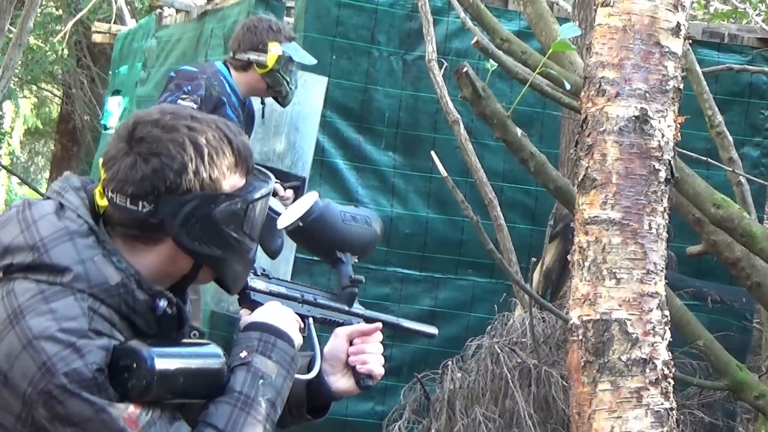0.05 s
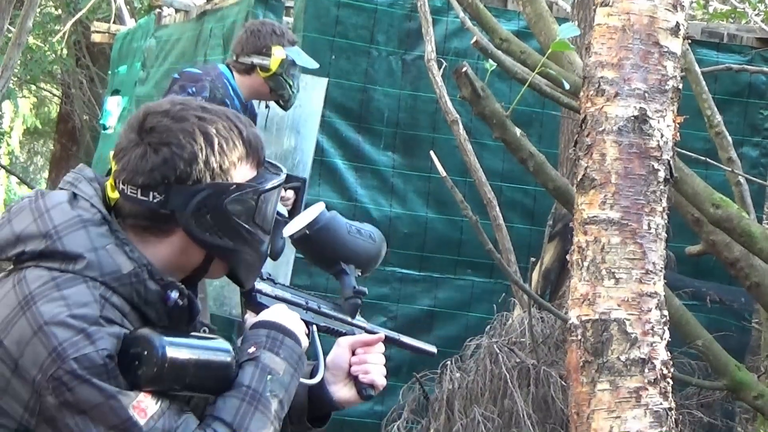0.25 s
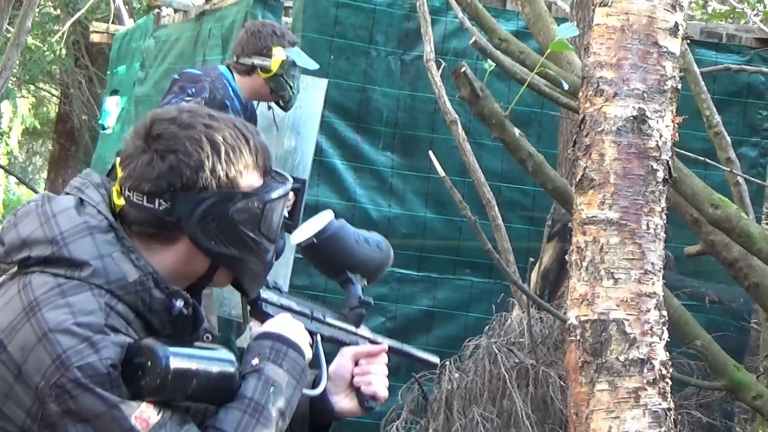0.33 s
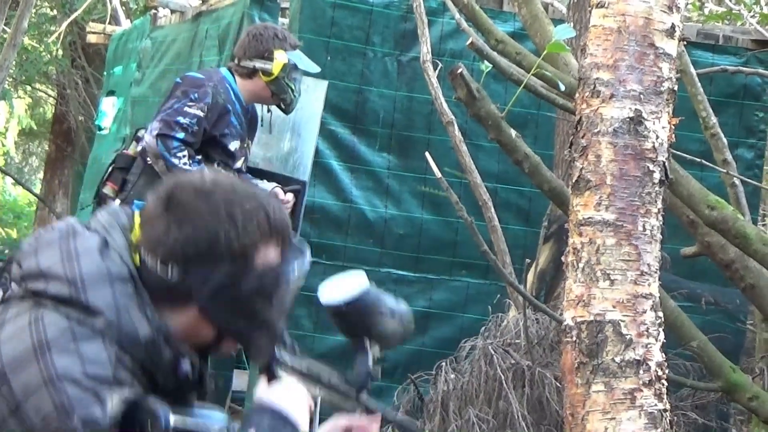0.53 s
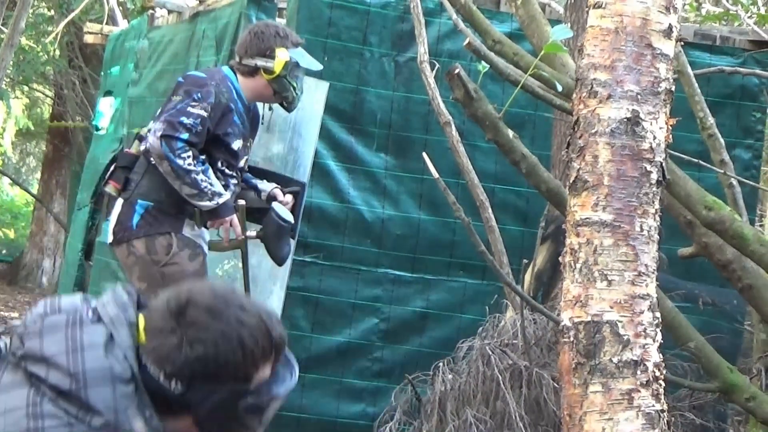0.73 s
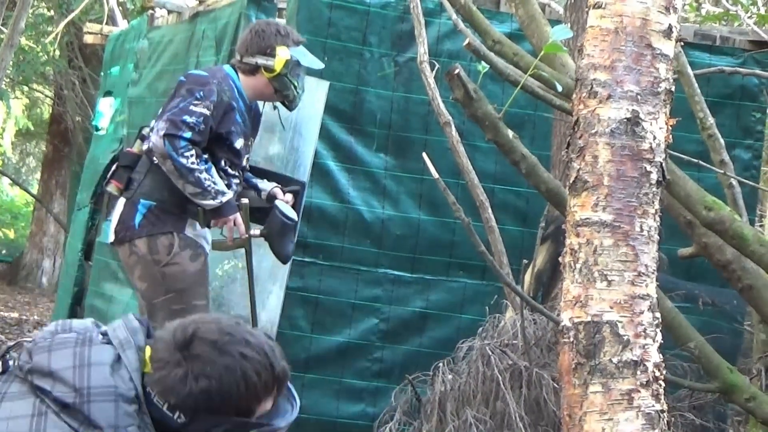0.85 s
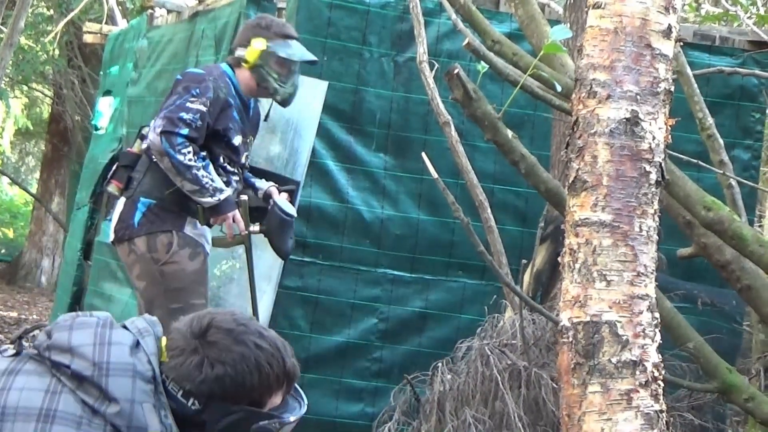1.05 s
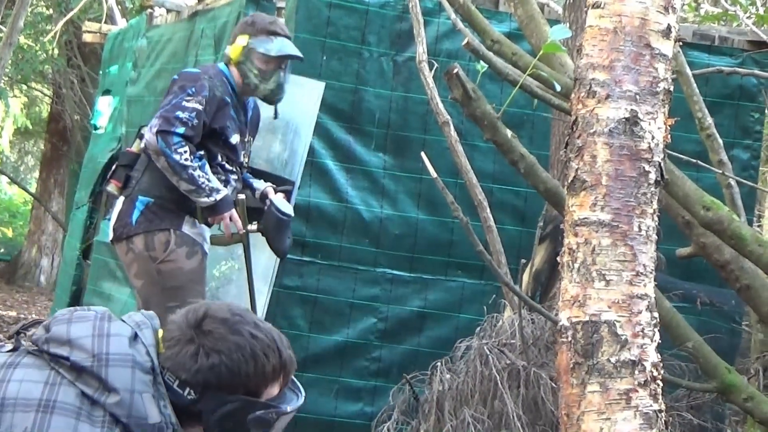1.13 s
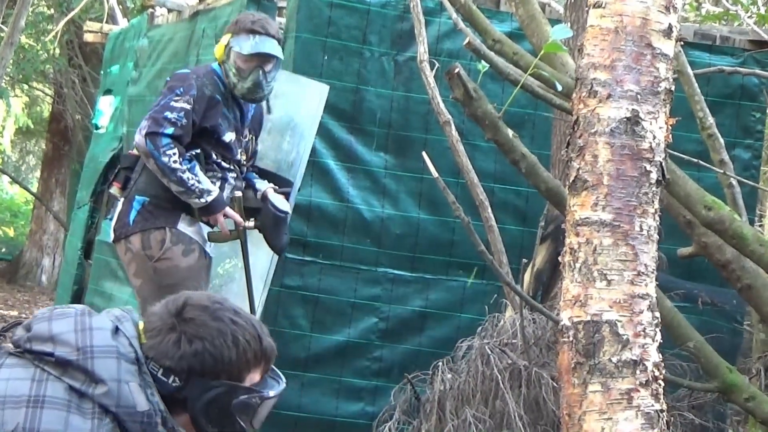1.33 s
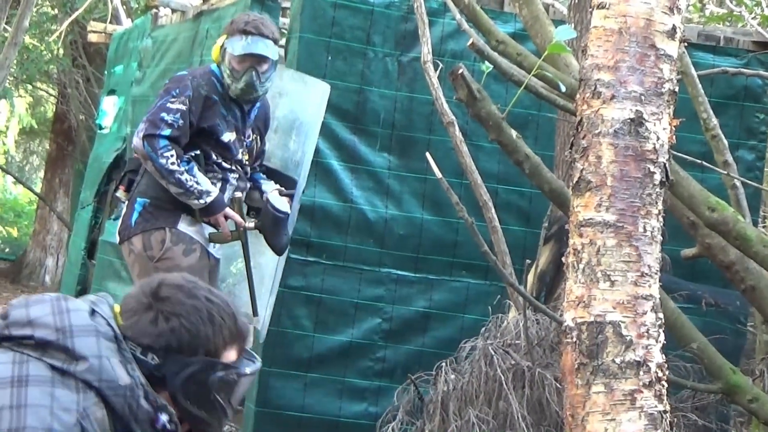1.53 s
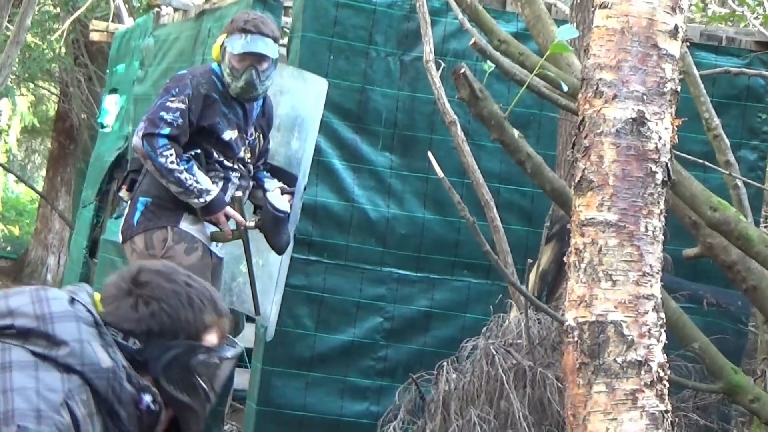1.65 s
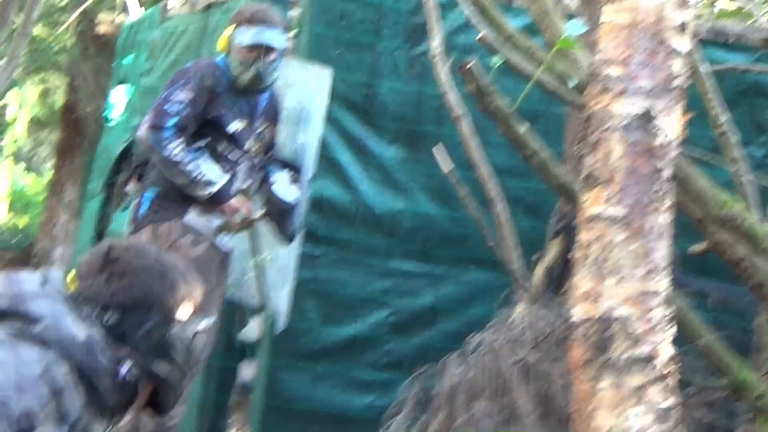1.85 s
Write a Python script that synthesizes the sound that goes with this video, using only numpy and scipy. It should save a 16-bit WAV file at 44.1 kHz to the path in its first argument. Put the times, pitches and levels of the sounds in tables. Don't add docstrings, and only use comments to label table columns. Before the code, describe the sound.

Paintball markers pop in a rapid uneven volley while paint shells crack and splat on a taut tarp close by; short hissy echoes scatter among trees, then only small clicks and faint road hum remain.

```python
import sys
import numpy as np
from scipy import signal
from scipy.io import wavfile

SR = 44100
rng = np.random.default_rng(int(sys.argv[2]) if len(sys.argv) > 2 else 0)


def how_loud(loudness_db):
    steps = np.asarray(loudness_db, float) / 20
    return 10 ** steps


def bounce(signal):
    frames = np.transpose(np.atleast_2d(signal))
    limited = np.clip(frames, -1, 1)
    pcm = np.round(limited * 32767).astype(np.int16)
    wavfile.write(sys.argv[1], SR, pcm)


N = 83790


def at_hz(points, hz):
    table_hz, value = np.transpose(points)
    return np.interp(np.log(hz), np.log(table_hz), value)


def bandpass(x, low_hz, high_hz):
    return signal.sosfilt(signal.butter(2, [low_hz, high_hz], "band", fs=SR, output="sos"), x)


def pan(db):
    return how_loud(np.array([[db], [-db]]) / 2)


def ring(clicks, modes, spread_db=0):
    out = 0
    for hz, db, t60 in modes:
        r = how_loud(-60 / (t60 * SR))
        w = 2 * np.pi * hz / SR
        gain = how_loud(db + spread_db * rng.standard_normal())
        out = out + gain * signal.lfilter([0, np.sin(w)], [1, -2 * r * np.cos(w), r * r], clicks)
    return out


def crackle(length_s, loss_db, count):
    when = np.append(0, rng.random(count) ** 1.4)
    strength = rng.uniform(.4, 1, count + 1) * rng.choice([-1, 1], count + 1)
    out = np.full(SR // 4, 1e-18)
    np.add.at(out, (length_s * when * SR).astype(int), how_loud(-loss_db * when) * strength)
    return out


def add(out, s, peak_db, blow):
    i = int(s * SR)
    out[i:i + len(blow)] += (how_loud(peak_db) * blow / np.abs(blow).max())[:len(out) - i]


def drift(rate_hz):
    r = np.exp(-40 * np.pi * rate_hz / SR)
    noise = rng.standard_normal(N // 20 + 2002)
    slow = signal.lfilter([1], [1, -2 * r, r * r], noise)[2000:]
    return np.interp(np.arange(N) / 20, np.arange(len(slow)), slow / slow.std())


def train(s, powers):
    out = np.full(N, 1e-18)
    np.add.at(out, np.clip((s * SR).astype(int), 0, N - 1), powers)
    return out


def fade(power, t60):
    loss = how_loud(-120 / (t60 * SR))
    rise = np.exp(-1 / (.003 * SR))
    return signal.lfilter([1 - rise], [1, -rise], signal.lfilter([1], [1, -loss], power))


# frequency in Hz, level in dB per Hz.
POP_TAIL = [(47, -57), (80, -12), (471, -4), (629, -1.5), (1490, -0.5), (1740, 1), (8600, -7.5),
            (15000, -16.5), (16000, -49)]
# frequency in Hz, level in dB per Hz.
BURST_TAIL = [(47, -57), (80, -27), (316, -20.5), (734, -7), (1530, -6), (1900, -4), (2660, -6.5),
              (8790, -14.5), (16000, -33)]
# frequency in Hz, level in dB per Hz.
SNAP_TAIL = [(1760, -68), (3000, -22), (3520, -12), (4440, -9), (8000, -12), (10400, -8), (16000, -51)]
# frequency in Hz, t60 in seconds.
WOOD_T60 = [(100, 0.22), (300, 0.34), (900, 0.36), (2000, 0.36), (5000, 0.42), (12000, 0.34)]


def scatter_kinds():
    spray_tail_db = -14.5
    spray = np.array(BURSTS)[:, :4] + [0, 0, 0, spray_tail_db]
    kinds = [(POPS, POP_TAIL, 1), (BURSTS, BURST_TAIL, 1), (spray, SNAP_TAIL, .7), (SNAPS, SNAP_TAIL, .4)]
    fed = []
    for rows, colour, shorter in kinds:
        rows = np.array(rows)
        fed.append((train(rows[:, 0], how_loud(2 * rows[:, -1])), colour, shorter))
    return fed


def scatter(kinds, hz):
    late_db, late_longer = -10.5, 2.4
    tail = 0
    for power, colour, shorter in kinds:
        t60 = at_hz(WOOD_T60, hz) * shorter
        dying = fade(power, t60) + how_loud(2 * late_db) * fade(power, t60 * late_longer)
        tail = tail + how_loud(2 * at_hz(colour, hz)) * dying
    return tail


# frequency in Hz, level in dB per Hz.
ROAD = [(25, -30), (76, -17), (300, -16), (600, -5.5), (1000, 0.5), (1700, -8), (4500, -22), (16000, -32.5)]
# time in seconds, level in dB.
ROAD_LEVEL = [(0.0, -52.5), (0.29, -55.5), (0.428, -66), (0.766, -41.5), (1.036, -48.5), (1.9, -50)]
# frequency in Hz, likeness from 0 to 1.
TAIL_LIKENESS = [(60, 0.99), (150, 1), (380, 1), (950, 0.98), (2380, 0.72), (5980, 0.71), (15000, 1)]
# frequency in Hz, likeness from 0 to 1.
ROAD_LIKENESS = [(60, 1), (150, 0.97), (380, 0.94), (950, 0.89), (2380, 0.14), (5980, 0.9), (15000, 1)]
# frequency in Hz, left minus right in dB.
TAIL_PAN = [(60, 0.0), (180, 0.26), (550, -0.5), (1650, -1.5), (4970, -1.8), (15000, -0.077)]
# frequency in Hz, left minus right in dB.
ROAD_PAN = [(60, 0.5), (180, 0), (550, 0.5), (1650, 3), (4970, 0), (15000, 1.5)]


def air():
    s, db = np.transpose(ROAD_LEVEL)
    road_db = np.interp(np.arange(N) / SR, s, db)
    together = drift(19)
    kinds = scatter_kinds()
    edges = np.geomspace(22, 17000, 21)
    white = rng.standard_normal((2, 2, N + 8000))
    out = 0
    for i, (low, high) in enumerate(zip(edges, edges[1:])):
        mid, side = bandpass(white[i % 2], low, high)[:, 8000:]
        hz = np.sqrt(low * high)
        alike = np.clip(at_hz(TAIL_LIKENESS, hz), 0, 1)
        road_alike = np.clip(at_hz(ROAD_LIKENESS, hz), 0, 1)
        own = drift(28.0)
        tail_gain = pan(at_hz(TAIL_PAN, hz)) * how_loud(8.5 + 1.05 * together + 1.67 * own)
        tail = scatter(kinds, hz) * tail_gain ** 2
        hum = (pan(at_hz(ROAD_PAN, hz)) * how_loud(road_db + at_hz(ROAD, hz) + 13.5 + 1.23 * own)) ** 2
        mid_power = (1 + alike) * tail + (1 + road_alike) * hum
        side_power = (1 - alike) * tail + (1 - road_alike) * hum
        out = out + np.sqrt(mid_power) * mid + np.sqrt(side_power) * side * [[1], [-1]]
    return out


# lowest in Hz, highest in Hz.
WIDE_HZ = (250, 9300)


def narrow(x):
    low_hz, high_hz = WIDE_HZ
    side = (x[0] - x[1]) / 2
    side = signal.sosfiltfilt(signal.butter(2, low_hz, "high", fs=SR, output="sos"), side)
    side = signal.sosfiltfilt(signal.butter(8, high_hz, fs=SR, output="sos"), side)
    return x.mean(axis=0) + side * [[1], [-1]]


# start in seconds, peak in dB, pitch in Hz, width in octaves, tail in dB.
SNAPS = [(0.09, -48.5, 8800, .6, -103), (0.3677, -15, 10400, 0.87, -36), (0.5111, -20, 9100, 0.52, -29),
         (0.5235, -7.5, 9400, 0.4, -27), (.5288, -24, 9300, 0.75, -47), (.7110, -28, 12500, 0.7, -44),
         (0.7183, -27, 8300, .8, -48), (0.723, -23, 8000, 0.72, -56), (0.7570, -33, 9000, .3, -57),
         (.7640, -14, 9100, .25, -60), (0.887, -23, 10800, 0.45, -43), (.9590, -34, 10100, 0.68, -65),
         (1.0490, -30.5, 7000, 0.71, -54), (1.0720, -36, 4700, .5, -50), (1.0850, -44, 5200, .7, -56),
         (1.0955, -20.5, 8700, 1.3, -43.5), (1.095, -31, 3750, .25, -70), (1.1054, -13.5, 8400, 0.67, -40),
         (1.1089, -16.5, 9200, 0.36, -43), (1.109, -37, 4500, 0.22, -70), (1.163, -36, 4800, 0.44, -52),
         (1.1730, -39, 6800, .8, -54), (1.1950, -40, 9300, .7, -48), (1.2140, -48, 9000, .8, -49),
         (1.24, -46, 6000, 1.2, -50.5), (1.2650, -40, 9500, .9, -56), (1.306, -38, 9000, 0.87, -74),
         (1.333, -39, 5050, 0.46, -57), (1.3500, -42, 12500, .3, -58), (1.4450, -41.5, 9500, 1.2, -56),
         (1.542, -40.5, 8100, 0.38, -53.5), (1.6520, -47, 8500, 0.76, -61), (1.7060, -34.5, 8400, 1.5, -65),
         (1.825, -50, 6500, 1.1, -78), (1.8494, -45, 10300, .9, -73)]


def gear_rustle():
    count, per_s, floor_db = 200, 110, -58
    s = rng.random(count) * count / per_s + 0.098
    db = floor_db + 3.1 * np.minimum(rng.exponential(1, count), 3)
    hz = rng.uniform(4000, 12500, count)
    width = rng.uniform(0.73, 1, count)
    return [row for row in np.transpose([s, db, hz, width]) if row[0] < N / SR]


def snaps():
    out = np.zeros(N)
    for s, db, hz, width in [row[:4] for row in SNAPS] + gear_rustle():
        half = max(width, .1) / 2
        low, high = np.minimum(hz * 2 ** np.array([-half, half]), .45 * SR)
        clicks = crackle(.0012, 20.0, count=5)[:800]
        add(out, s, db, bandpass(clicks, low, high))
    return out


# start in seconds, peaks of tarp, shell and spray in dB, tail in dB.
BURSTS = [
    (0.214, -55, -52, -52, -46),
    (0.2577, -47, -27, -30, -36.5),
    (0.3530, -15.5, -23, -16, -30),
    (0.4998, -18, -19, -28, -31),
    (.5075, -19, -30, -22, -62),
    (0.5674, -14.5, -10, -17.5, -27.5),
    (0.7634, -13, -17, -11, -26),
    (.7820, -20.5, -26, -34, -40),
    (0.8654, -12, -18, -29, -30),
]
LANDING = [(2, -4, -4, 4, 4), (7, 0, -8, 0, 2), (0, 7, -10, 0, 8), (6.5, 3, -21, -1.5, -3),
           (-20, -3, 3, 15, -3), (4.5, -4.5, 8, 5, 8.5), (5, 7, 12, 9, -18), (2, 10, -2, 1, -10),
           (-13, -18, 6.5, 9, 6)]
# shell in Hz, spray in Hz.
BURST_HZ = [(4540, 18000), (5070, 8800), (4800, 9900), (4200, 7300), (5000, 9600), (4720, 11200),
            (6230, 7500), (4700, 7500), (5200, 6500)]
# frequency in Hz, level in dB, t60 in seconds.
TARP = [(887, 5.5, 0.062), (1490, 3, 0.027), (1683, -1.5, 0.045), (2352, 3.5, 0.013), (2950, -0.5, 0.01)]
# multiple of the pitch, level in dB, t60 in seconds.
SHELL = [(.75, -4, .002), (1, 0, .0035), (1.22, -4, .002), (1.5, -9, .002)]
# multiple of the pitch, level in dB, t60 in seconds.
SPRAY = [(.85, -5, .002), (1, 0, .0045), (1.13, -6, .002), (1.4, -17, .0015)]


def bursts():
    out = np.zeros(N)
    for (s, tarp_db, shell_db, spray_db, _), landing, (shell_hz, spray_hz) in zip(BURSTS, LANDING, BURST_HZ):
        clicks = signal.lfilter([1, 2, 1], 1, crackle(.003, 15, count=8))
        struck_tarp = np.add(TARP, np.outer(landing, [0, 1, 0]))
        add(out, s, tarp_db, np.diff(ring(clicks, struck_tarp)))
        add(out, s, shell_db, np.diff(ring(clicks, np.multiply(SHELL, [shell_hz, 1, 1]))))
        add(out, s, spray_db, np.diff(ring(clicks, np.multiply(SPRAY, [spray_hz, 1, 1]))))
    return out


# start in seconds, peak in dB, thump in dB, tail in dB.
POPS = [
    (0.238, -12.5, -34.5, -38.5),
    (0.3945, -12, -33, -36.5),
    (.4240, -18, -70, -45.5),
    (0.5398, -13.5, -32.5, -38.5),
    (0.737, -11, -31.5, -36.5),
    (0.8384, -11, -33.5, -35.5),
]
# offset in seconds, level in dB.
VALVE = [(-.0027, -15), (-.0015, -13), (0, 0), (.0018, -11), (.0031, -13)]
# frequency in Hz, level in dB, t60 in seconds.
BARREL = [(945, -20.5, 0.3), (1210, -15.5, 0.061), (1670, -6, 0.025), (1900, -7, 0.013), (2033, -2, 0.015),
          (2950, -5, 0.0098)]
# frequency in Hz, level in dB, t60 in seconds.
BODY = [(141, -43, 0.37), (170, -8, 0.17), (241.4, -4, 0.15), (370, -0.5, 0.18)]


def pops():
    out = np.zeros(N)
    lag, db = np.transpose(VALVE)
    for s, peak_db, thump_db, _ in POPS:
        knock_s = lag - lag[0] + rng.uniform(0, .0003, len(lag))
        clicks = np.full(SR // 4, 1e-18)
        clicks[(knock_s * SR).astype(int)] = how_loud(db + rng.normal(0, 1.5, len(lag)))
        push = how_loud(12) * bandpass(clicks, 500, 4500)
        add(out, s + lag[0], peak_db, push + ring(clicks, BARREL, spread_db=2.0))
        soft = signal.lfilter([.05], [1, -.95], clicks)
        add(out, s + lag[0], thump_db, ring(soft, BODY, spread_db=2.0))
    return out


# start in seconds, peak in dB, pitch in Hz.
THUDS = [(.2385, -24, 2950), (.3535, -17, 2800), (0.497, -37, 222), (0.504, -23, 1910), (0.772, -18, 1360),
         (0.779, -21, 1950), (0.786, -32, 880), (.766, -27, 540), (.797, -22, 710), (.806, -26, 1100),
         (.814, -27, 650), (.826, -27, 900), (.843, -26, 645), (.933, -30, 577), (1.453, -46, 240),
         (1.642, -37, 940), (1.653, -40, 2080), (1.697, -35, 1010), (1.703, -37, 2020)]


def thuds():
    out = np.zeros(N)
    for s, db, hz in THUDS:
        soft = signal.lfilter([.1], [1, -.9], crackle(0.00074, 8.9, count=2))
        t60 = 18 / hz
        add(out, s, db, np.diff(ring(soft, [(hz, 0, t60), (hz * 1.22, -9, t60)])))
    return out


def scene():
    low_cut = signal.butter(4, 115, "high", fs=SR, output="sos")
    blows = signal.sosfilt(low_cut, pops() + bursts() + thuds())
    bass = signal.sosfilt(signal.butter(2, 700, fs=SR, output="sos"), blows)
    return narrow(air()) + snaps() * pan(-2.7) + bass + (blows - bass) * pan(-3)


def band_limit(x):
    return signal.sosfilt(signal.butter(12, 16490, fs=SR, output="sos"), x)


def record(dry):
    presence_hz, width_hz, lift = 9000, 3000, 0.88
    r = np.exp(-np.pi * width_hz / SR)
    w = 2 * np.pi * presence_hz / SR
    presence = signal.lfilter([(1 - r * r) / 2, 0, (r * r - 1) / 2], [1, -2 * r * np.cos(w), r * r], dry)
    overloaded = 0.68 * np.tanh((dry + lift * presence) / 0.96)
    finished = signal.sosfilt(signal.cheby2(12, 40, 15850, fs=SR, output="sos"), overloaded)
    return band_limit(finished)


dry = scene()
out = record(dry)
bounce(out)
```